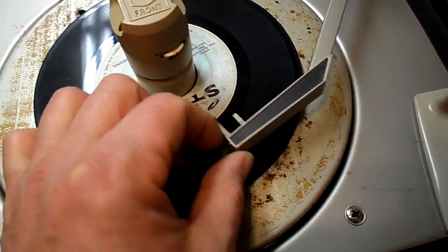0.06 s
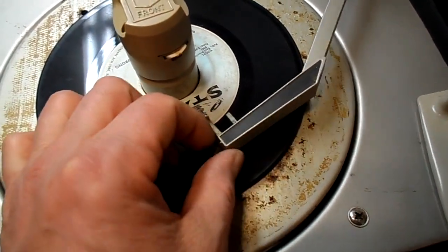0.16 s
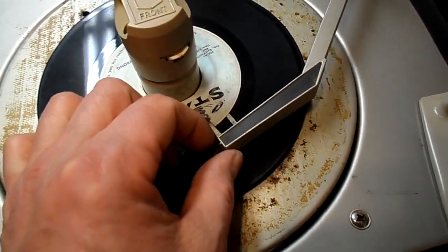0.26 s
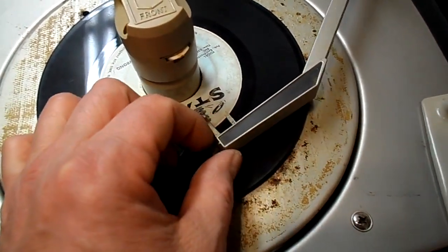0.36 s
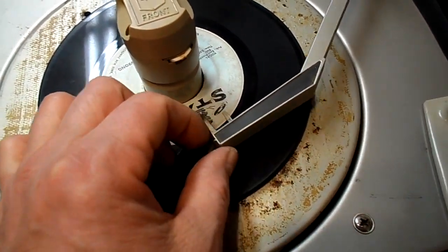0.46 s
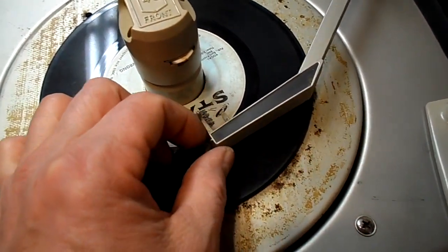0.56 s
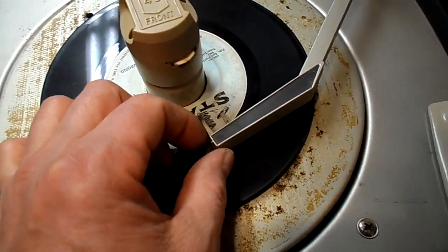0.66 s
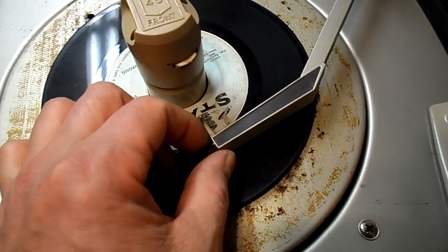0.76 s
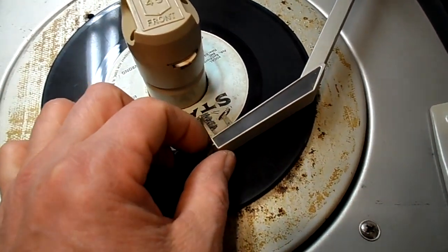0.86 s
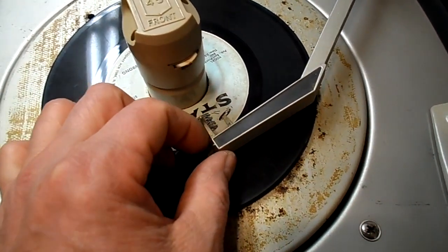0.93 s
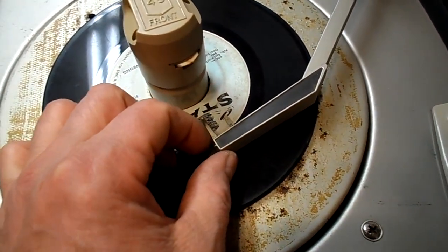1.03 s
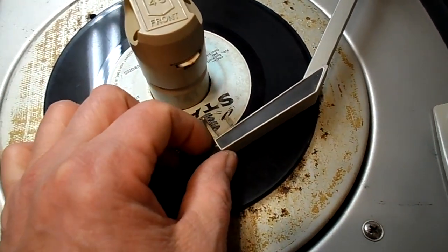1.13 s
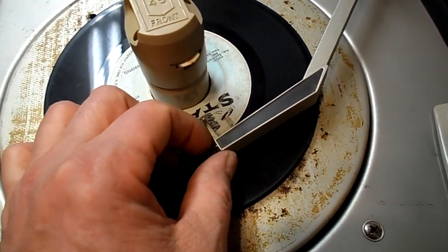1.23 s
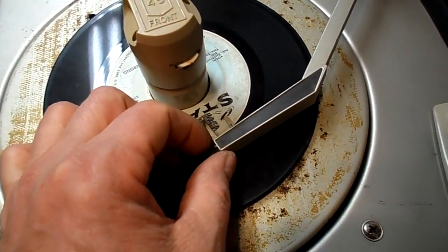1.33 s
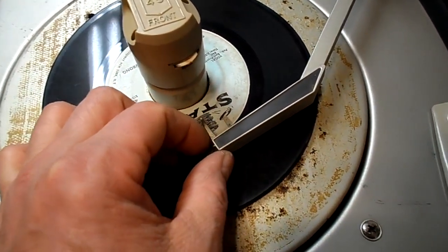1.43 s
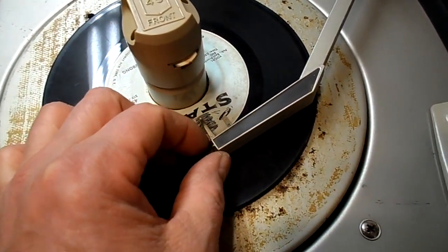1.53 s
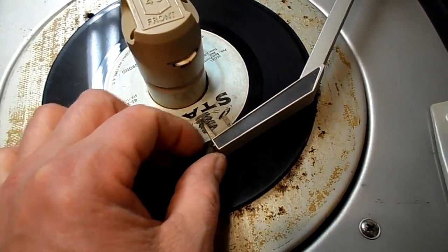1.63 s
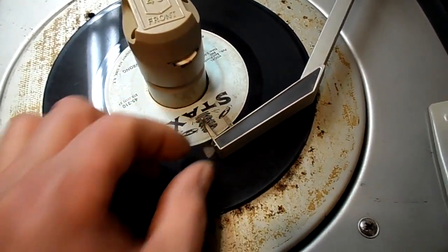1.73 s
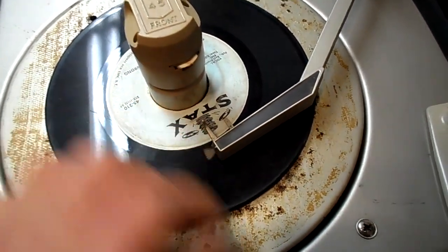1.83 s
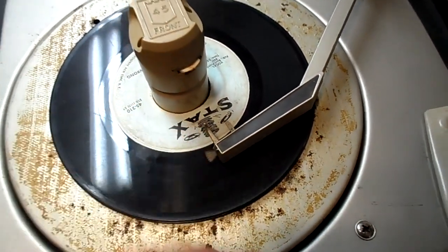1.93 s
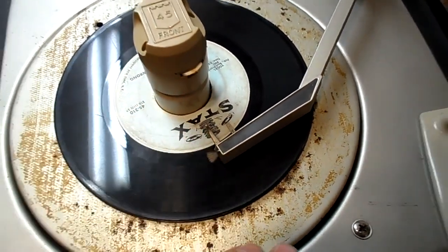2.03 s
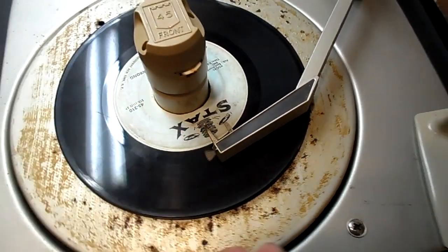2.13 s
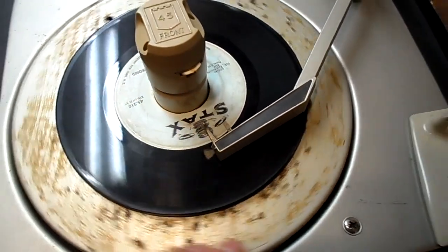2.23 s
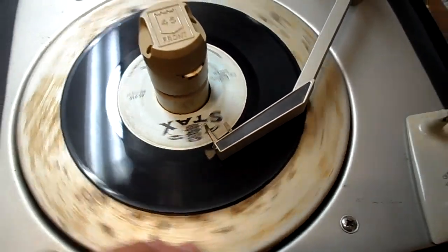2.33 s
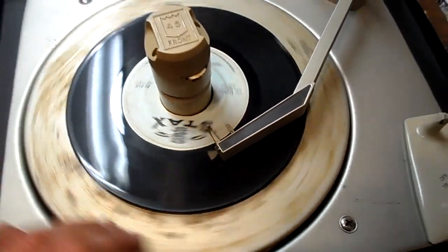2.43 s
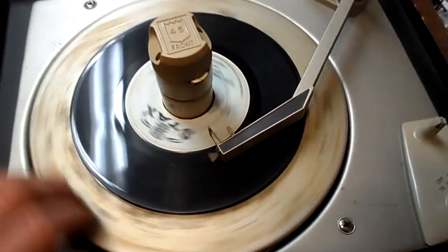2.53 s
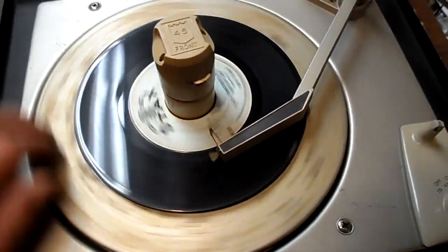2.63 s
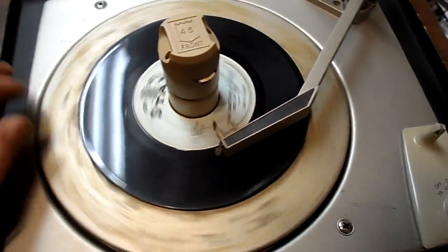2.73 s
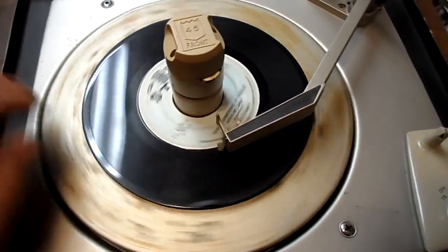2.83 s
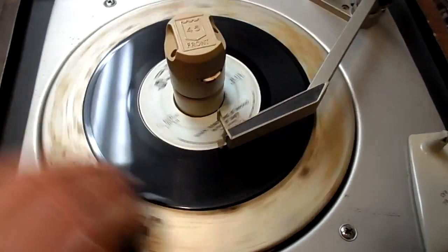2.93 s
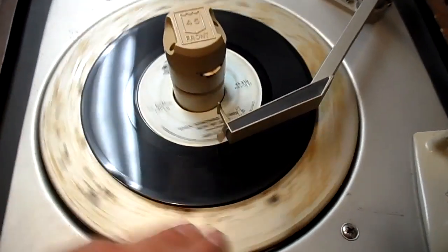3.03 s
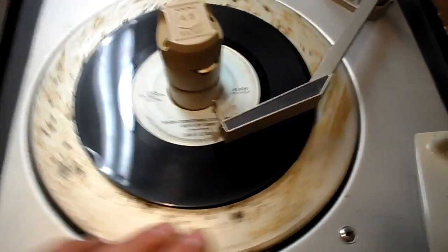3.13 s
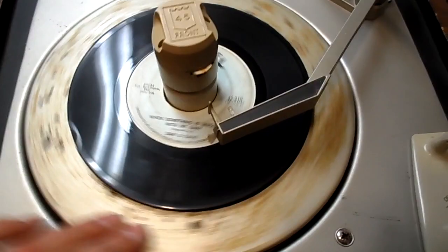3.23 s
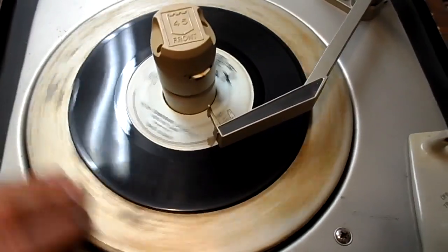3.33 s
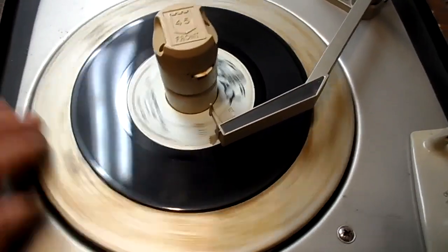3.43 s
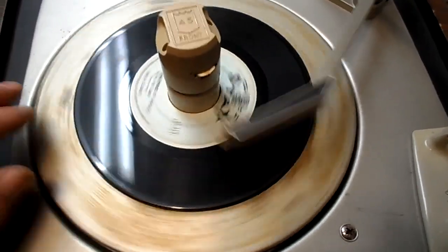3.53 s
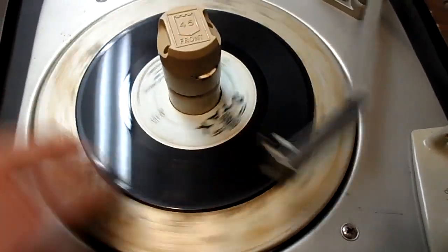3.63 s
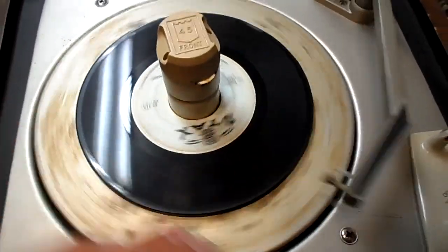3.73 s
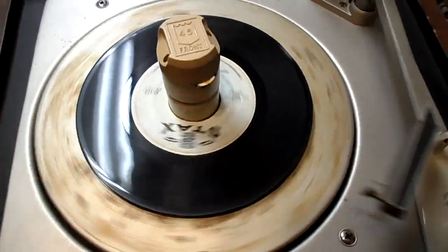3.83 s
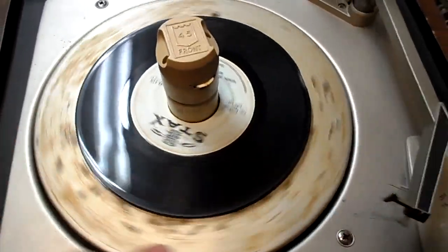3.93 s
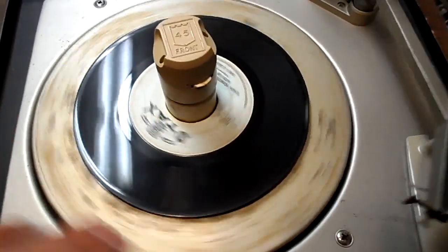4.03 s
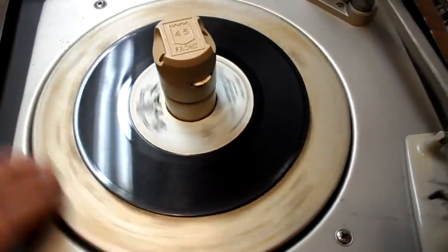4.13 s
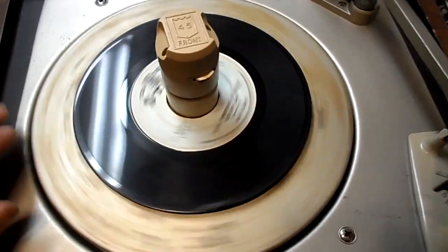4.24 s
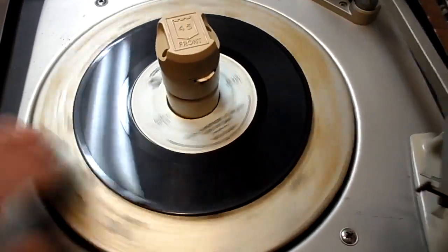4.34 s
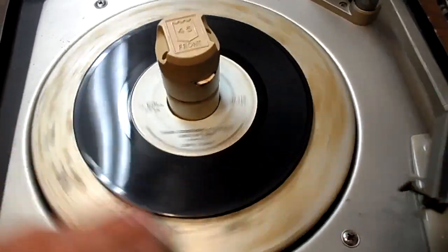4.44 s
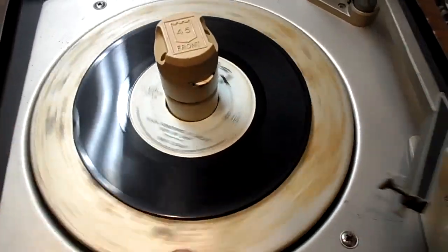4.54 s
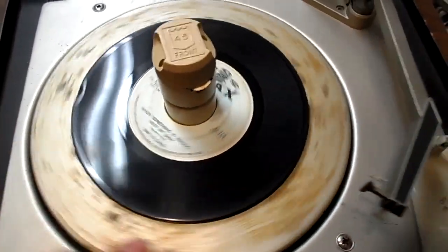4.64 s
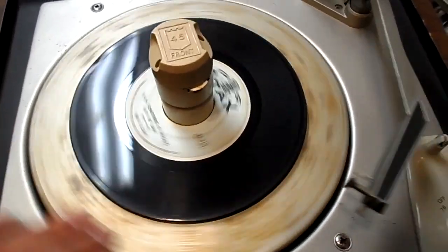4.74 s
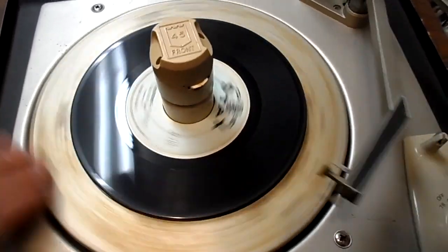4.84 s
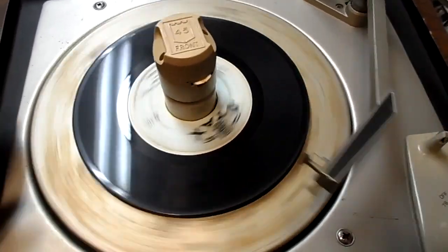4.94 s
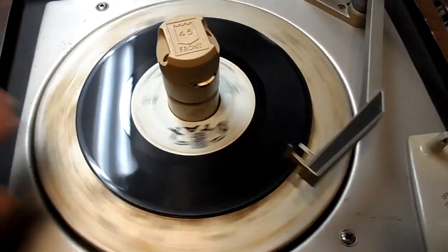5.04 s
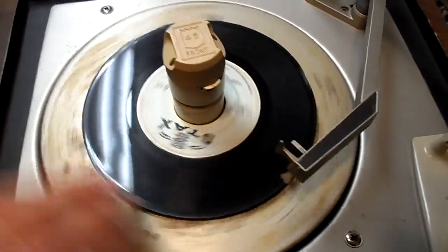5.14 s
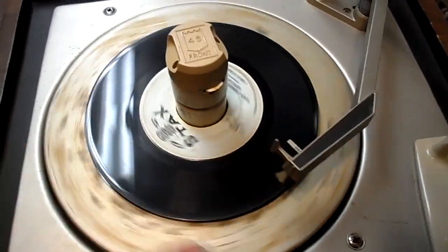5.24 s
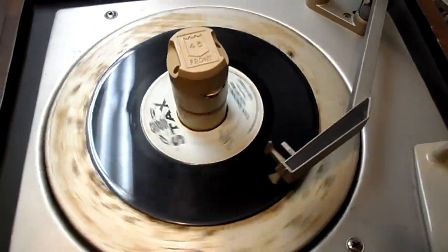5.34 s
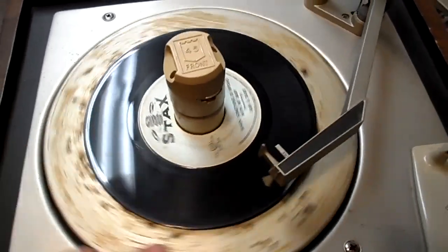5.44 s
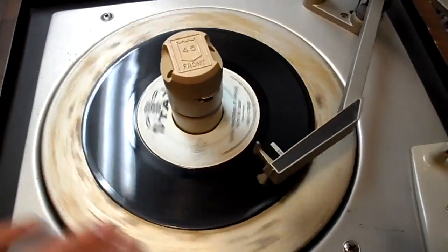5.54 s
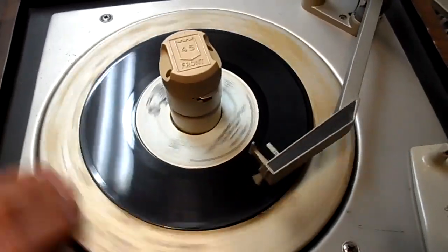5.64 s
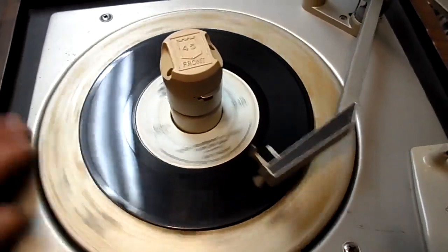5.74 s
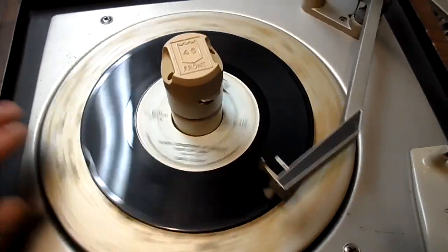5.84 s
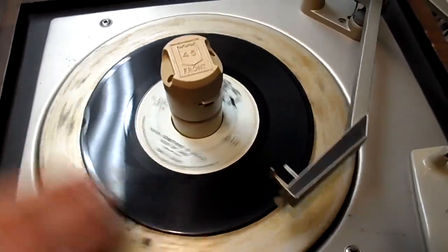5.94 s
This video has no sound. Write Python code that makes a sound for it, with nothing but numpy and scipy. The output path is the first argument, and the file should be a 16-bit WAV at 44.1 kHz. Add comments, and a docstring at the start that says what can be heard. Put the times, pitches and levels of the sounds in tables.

```python
"""A hand turns the platter of a record changer. First there is only a quiet room with mains hum,
a fine sizzle and a thin whine. From about 2 s, cams tick against the steel deck and the works rumble.
At 2.5 s a lever scrapes into gear, sticking and slipping, and then gears whirr as they swing the
tone arm out and back. From 3.3 s the hand brushes the rim in soft swishes. At last, just before 6 s,
the mechanism trips: a bouncing lever makes one sharp clack."""
import sys
import numpy as np
from scipy import signal
from scipy.fft import rfft, irfft, next_fast_len
from scipy.io import wavfile
from scipy.ndimage import uniform_filter1d, map_coordinates

SR = 44100
rng = np.random.default_rng(int(sys.argv[2]) if len(sys.argv) > 2 else 0)


def to_wav(s):
    """Save 16-bit WAV."""
    ch = np.atleast_2d(s).T  # columns
    pcm = np.round(np.clip(ch, -1, 1) * 32767)  # PCM
    wavfile.write(sys.argv[1], SR, pcm.astype(np.int16))


N = 264114
TIME = np.arange(N) / SR


def amp(db):
    """Turn decibels into a number to multiply by."""
    return 10 ** (np.asarray(db) / 20)


def unit(x):
    """Scale a sound so its average strength (rms) is 1."""
    return x / np.sqrt(np.mean(x ** 2) + 1e-20)


def along(points, hz):
    """Gain at hz on a curve through (frequency [Hz], level [dB]) points."""
    f, db = np.transpose(points)
    return amp(np.interp(np.log(hz + 1), np.log(f + 1), db))


def gains(rows):
    """Gain that follows (time [s], level [dB]) points, silent before the first."""
    s, db = np.transpose(rows)
    return amp(np.interp(TIME, s, db)) * (TIME >= s[0])


def swells(rows, rise, fall):
    """Gain of events that rise, hold and fall; rise and fall are in dB per second."""
    return np.max([amp(db - rise * np.maximum(s - TIME, 0) - fall * np.maximum(TIME - s - hold, 0))
                   for s, hold, db in rows], axis=0)


def wobble(rate):
    """A smooth random curve through `rate` new values a second."""
    return map_coordinates(rng.standard_normal(int(N * rate / SR) + 4), [TIME * rate])


def filtered(x, response):
    """Shape a sound with a filter given as a function of frequency."""
    size = next_fast_len(len(x) + 8192)
    return irfft(rfft(x, size) * response(np.fft.rfftfreq(size, 1 / SR)), size)[:len(x)]


def modes(rows):
    """A filter that rings at each (pitch [Hz], width [Hz], level [dB]); narrow ones ring longer."""
    return lambda f: sum((-1) ** k * amp(db) * 1j * f * width / (hz * hz - f * f + 1j * f * width)
                         for k, (hz, width, db) in enumerate(rows))


def grit(rate, spiky_db):
    """Friction: noise whose strength jumps from one tiny catch to the next."""
    return unit(amp(spiky_db * wobble(rate)) * rng.standard_normal(N))


# Tones of the hum: (pitch [Hz], level [dB], waver [dB])
HUM_TONES = [(119.9, -57, .25), (240, -82, 2), (249.7, -71.5, 1.5), (299.7, -81, 2), (799, -85, 3),
             (1049, -86, 3), (1123, -87, 3), (1498, -89, 3), (11500, -94, 2)]

def hum():
    """Mains power drives steady tones, each wavering a little in strength and phase."""
    out = np.zeros(N)
    for hz, db, waver_db in HUM_TONES:
        strength = np.sqrt(2) * amp(db + waver_db * wobble(9.1))
        drift = 0.3 * waver_db * wobble(5.6)
        out += strength * np.sin(2 * np.pi * hz * TIME + drift + rng.uniform(0, 2 * np.pi))
    return out


# Tone colour of the room's noise: (frequency [Hz], relative level [dB])
ROOM_COLOUR = [(10, -32), (16, 4), (28, 4), (50, -0.5), (100, -7), (150, -11.5), (250, -15), (400, -17),
               (700, -20), (1400, -22.5), (3600, -26.5), (6000, -25), (11000, -37), (16000, -34.5)]
# Bumps on that colour: (centre [Hz], width [Hz], boost [dB])
ROOM_BUMPS = [(229, 71, 1), (800, 57, 3), (1120, 150, 5), (3050, 82, 4.5)]

def room():
    """Steady room tone and hiss, strongest in the deep bass."""
    bumps = lambda f: amp(sum(db / (1 + ((f - hz) / width * 2) ** 2) for hz, width, db in ROOM_BUMPS))
    return amp(-60) * unit(filtered(rng.standard_normal(N), lambda f: along(ROOM_COLOUR, f) * bumps(f)))


# Loudness of the sizzle: (time [s], level [dB])
SIZZLE_LEVELS = [(0, -66.5), (.7, -65), (1.4, -66), (1.6, -68.5), (2.9, -66), (3.25, -64), (3.6, -66),
                 (4.3, -64.5), (4.85, -70), (5.3, -65), (5.99, -65)]
# Its tone colour: (frequency [Hz], relative level [dB])
SIZZLE_COLOUR = [(4500, -35), (5800, -12.5), (7000, -4), (8500, 0), (9800, -3.5), (11500, -13),
                 (14000, -18)]

def sizzle():
    """A fine, high sizzle swells and fades."""
    fizz = unit(filtered(grit(40, spiky_db=1.1), lambda f: along(SIZZLE_COLOUR, f)))
    return gains(SIZZLE_LEVELS) * fizz


# Peaks of the whine's filter, applied twice: (pitch [Hz], width [Hz], relative level [dB])
WHINE_PEAKS = [(6440, 100, 0), (7030, 100, 0), (7410, 50, 0), (8500, 60, 1.5), (9050, 50, 0)]

def whine(rest_db=-74, spinning_db=-72.5, spin_s=3.3):
    """A thin, wavering whine, a little louder once the platter spins."""
    level_db = np.where(TIME < spin_s, rest_db, spinning_db) + 1.2 * wobble(2.75)
    return amp(level_db) * unit(filtered(grit(30, spiky_db=1), lambda f: modes(WHINE_PEAKS)(f) ** 2))


# Cam contacts: (time [s], relative knock level [dB], knock pitch [Hz],
# relative click level [dB], click pitch [Hz], time for the chatter to fade by 60 dB [s])
CAM_CONTACTS = [(1.9404, -57, 1600, -62, 4500, .024), (2.0034, -64, 1200, -33, 4400, 0.0089),
                (2.3021, -53, 300, -62, 5300, .025), (2.488, -68, 1200, -48, 5600, .018),
                (2.4944, -64, 1200, -44, 5000, .02), (2.5048, -59, 300, -44, 4600, .016),
                (2.746, -62, 600, -50, 8000, .011), (2.7773, -42.5, 400, -33.5, 7000, 0.014),
                (2.7854, -34, 1020, -32.5, 4180, 0.032), (2.7915, -41, 950, -50, 4000, 0.027),
                (2.7973, -40, 850, -42, 5000, 0.019), (2.8419, -49, 800, -39, 4280, 0.035),
                (2.8851, -37.5, 910, -33, 2450, 0.025), (2.8879, -37.5, 1100, -29, 2840, 0.013),
                (2.897, -37, 520, -36, 3400, 0.019), (2.9144, -61, 700, -43, 6500, 0.016),
                (2.9352, -65, 900, -44, 5300, .02), (3.1559, -41.5, 1900, -37, 13500, 0.037),
                (3.617, -55, 600, -64, 4000, 0.018), (3.76, -57, 1090, -66, 4000, .02),
                (3.8101, -40, 1900, -31.5, 7600, .028), (3.816, -47, 500, -39, 2450, 0.031),
                (3.9144, -64, 1200, -55, 4800, .018), (3.9288, -53, 1100, -66, 4800, 0.019),
                (4.0002, -45.5, 1410, -62, 2900, 0.065), (4.0207, -54, 1200, -60, 8000, .038),
                (4.105, -56, 500, -50, 2900, 0.054), (4.4822, -54.5, 1600, -66, 4500, 0.037),
                (4.5094, -57, 1100, -66, 4000, 0.023), (5.1903, -56, 700, -46, 6200, 0.025),
                (5.197, -51, 1700, -48, 5000, 0.038), (5.2046, -49, 1300, -40, 5670, 0.049),
                (5.22, -52, 1000, -59, 3000, 0.028), (5.2339, -52, 1500, -59, 5000, 0.049),
                (5.2494, -60, 900, -50, 6840, 0.038), (5.3754, -49, 600, -62, 5000, 0.033),
                (5.438, -58, 600, -52, 8000, 0.032), (5.522, -52, 500, -55.5, 1600, 0.03),
                (5.5742, -55.5, 1200, -58.5, 3400, 0.02), (5.9572, -38, 1100, -60, 3400, .01)]
# How the steel deck rings: (pitch [Hz], width [Hz], relative level [dB])
DECK_RINGS = [(230, 70, 0), (300, 70, 0), (720, 130, 0), (900, 100, 0), (1150, 150, 0), (1560, 120, 0),
              (2290, 150, 0), (2850, 250, 0), (3200, 170, 0), (3700, 150, -1), (4850, 150, 0),
              (5800, 200, 0), (6300, 200, 0), (7100, 200, 0), (8600, 300, 0), (9200, 200, 0),
              (9950, 200, 0), (11650, 250, 0)]

def ticks():
    """Each contact is a blow and a short chatter that ring the deck: a low knock and a bright click."""
    def band(f, db, hz, below_db, above_db):
        """A peak at hz that loses below_db one octave down and above_db one octave up."""
        octaves = np.abs(np.log2((f + 1) / hz))
        return amp(db - np.where(f < hz, below_db, above_db) * octaves ** 2.8)

    out = np.zeros(N + SR)
    t = np.arange(-200, SR // 6) / SR
    # narrow low bands catch less of a burst, so they are lifted
    lift = lambda f: np.sqrt(3000 / (f + 300)) * (f > 170)
    deck = lambda f: (1 + amp(-6) * modes(DECK_RINGS)(f)) * lift(f)
    blow = amp(21) * (t == 0)
    for s, knock_db, knock_hz, click_db, click_hz, fade_s in CAM_CONTACTS:
        knock = lambda f: band(f, knock_db, knock_hz, below_db=3, above_db=3)
        click = lambda f: band(f, click_db, click_hz, below_db=18, above_db=36)
        chatter = amp(6.5 - 60 * np.maximum(t, 0) / fade_s) * (t > 0) * rng.standard_normal(len(t))
        tick = filtered(blow + chatter, lambda f: (knock(f) + click(f)) * deck(f))
        out[round((s + t[0]) * SR):][:len(t)] += tick
    return out[:N]


# Load on the turning works: (time [s], relative level [dB])
LOAD = [(2.2, -5), (2.6, -7.5), (2.95, -3.5), (3.15, -1), (3.4, -3), (3.6, -4), (3.8, 6.5), (3.92, 3),
        (4.1, -3), (4.38, 0.5), (4.6, -3.5), (4.9, -2.5), (5.1, 1.5), (5.28, 0.5), (5.6, -4.5), (5.8, -7),
        (5.93, 3.5)]

def works():
    """The deck rumbles and the cams rattle, both louder under more load."""
    deck = modes([(240.7, 39, 1.5), (316, 82, -2), (391, 274, -7.5)])
    cams = modes([(680, 1300, 5.4), (1160, 140, 3), (1510, 230, 0.5)])
    rumble = unit(filtered(grit(40, spiky_db=2), deck))
    rattle = unit(filtered(grit(90, spiky_db=2.5), cams))
    load = gains(LOAD)
    return amp(-66) * load ** 0.71 * rumble + amp(-70.5) * load * rattle


# Jerks of the lever dragging over metal: (time [s], hold [s], level [dB])
LEVER_JERKS = [(2.485, 0.031, -57), (2.545, .015, -54), (2.575, 0.032, -47), (2.62, .012, -53),
               (2.66, 0.053, -46.5), (2.785, 0.031, -43.5), (2.835, 0.021, -41), (2.88, 0.031, -41),
               (2.932, 0.0073, -44)]
# Tone colour of its rasp: (frequency [Hz], relative level [dB])
RASP_COLOUR = [(880, -49), (1500, -18), (2310, -15), (3150, 0.5), (4370, -8.5), (6240, -3.5), (9270, -5),
               (11000, -17.5), (15000, -31)]
# How the lever rings: (pitch [Hz], width [Hz], relative level [dB])
LEVER_RINGS = [(3050, 260, -17), (4880, 30, 7), (5210, 34, 6), (5750, 360, -2.5), (6360, 110, 4.5),
               (7000, 47, -1), (7570, 29, 6), (8620, 200, -17), (9060, 190, -2), (9770, 69, 5)]

def lever():
    """The lever sticks and slips; the tiny catches make it ring over a broad rasp."""
    colour = lambda f: along(RASP_COLOUR, f) * (0.67 + np.abs(modes(LEVER_RINGS)(f)))
    catches = amp(1.2 * wobble(90)) * grit(1200, spiky_db=4)
    return swells(LEVER_JERKS, rise=334, fall=1500) * unit(filtered(catches, colour))


# Spells of whirring: (time [s], hold [s], level [dB])
GEAR_RUNS = [(2.95, 0.16, -70.5), (3.65, 0.35, -71), (4.4, 0.34, -71), (5.08, .12, -71),
             (5.27, 0.13, -69.5), (5.9, .1, -71)]
# Peaks of the gears' filter, applied twice: (pitch [Hz], width [Hz], relative level [dB])
GEAR_PEAKS = [(2230, 120, -5), (2520, 90, 1), (2820, 90, -2), (3120, 90, -5)]

def gears():
    """The gears whirr while they drive the tone arm."""
    whirr = unit(filtered(grit(90, spiky_db=2.5), lambda f: modes(GEAR_PEAKS)(f) ** 2))
    return swells(GEAR_RUNS, rise=81, fall=44) * whirr


# Strokes of the hand on the rim: (time [s], hold [s], level [dB])
HAND_STROKES = [(3.34, 0.028, -56), (3.64, .05, -61.5), (3.715, 0.02, -58), (4.31, .04, -64.5),
                (4.36, 0.032, -59.5), (4.42, .045, -63), (4.85, 0.031, -61), (5.065, 0.054, -61.5),
                (5.135, 0.027, -58.5), (5.645, .02, -68), (5.8, .04, -66), (5.87, 0.077, -61.5)]
# Tone colour of sliding skin: (frequency [Hz], relative level [dB])
SKIN_COLOUR = [(1500, -25), (3000, -2), (4500, -7.5), (6000, -4.5), (8000, 0), (10000, 3), (12500, -7),
               (16000, -12)]

def hand():
    """Skin slides on the platter's rim: soft, bright swishes with faint squeaks."""
    squeak = modes([(4500, 100, 9), (5850, 87, 10), (9400, 110, -3)])
    colour = lambda f: along(SKIN_COLOUR, f) * (1 + np.abs(squeak(f)))
    return swells(HAND_STROKES, rise=400, fall=350) * unit(filtered(grit(200, spiky_db=2), colour))


# Where the trip lever rings: (pitch [Hz])
TRIP_PITCHES = [290, 520, 850, 1118, 1560, 1950, 2724, 2830, 3188, 3718, 4822, 5415, 5968, 6592, 7030, 7195,
                7450, 8860, 9171, 9721, 9979, 10800, 11650, 12600, 14200]
# The ring at each of those pitches: (width [Hz], relative level [dB])
TRIP_RINGS = [(40, 3.5), (120, -3), (100, -3.5), (24, 8.5), (70, -2.5), (100, 2), (110, 7.5), (80, 16),
              (60, 3), (45, 13), (50, 6), (70, 12), (55, 7), (80, 13), (40, 7), (80, 0), (150, 3),
              (200, 11.5), (130, 10), (80, 14), (65, 5), (130, -6), (100, 0), (100, -3), (200, -15)]

def trip(at_s=5.9592, first_gap_s=0.0009, gap_growth=1.27):
    """The trip lever bounces eight times, so fast that all its pitches ring as one clack."""
    lead_s = 0.005
    t = np.arange(SR // 10) / SR - lead_s
    bounce_times = first_gap_s * (gap_growth ** np.arange(8) - 1) / (gap_growth - 1)
    # each bounce is weaker than the last and dies in about 4 ms
    bounces = sum(amp(-1400 * s - 60 * np.maximum(t - s, 0) / 0.0039) * (t >= s) for s in bounce_times)
    spectrum = rfft(bounces * rng.standard_normal(len(t)))
    # even out the spectrum so every pitch gets the same push; this smears the rattle in time
    rattle = irfft(spectrum / np.sqrt(uniform_filter1d(np.abs(spectrum) ** 2, size=15)), len(t))
    # turn down the smear before the slam so the clack starts sharply
    rattle *= np.where(t < 0, amp(-14), 1)
    ring = modes([(hz, width, db) for hz, (width, db) in zip(TRIP_PITCHES, TRIP_RINGS)])
    crash = lambda f: amp(-5.5) * 1j * f / (1j * f + 1200)
    soften = lambda f: 1 / (1 + 1j * f / 9000) / (1 + 1j * f / 16000)
    clack = amp(9.5) * filtered(rattle, lambda f: (crash(f) + ring(f)) * soften(f))
    out = np.zeros(N + SR)
    out[round((at_s - lead_s) * SR):][:len(t)] = clack
    return out[:N]


def echo(x, fade_s=0.11):
    """The cabinet and room answer a sound with a short echo."""
    t = np.arange(SR // 3) / SR
    tail = rng.standard_normal(len(t)) * amp(-60 * t / fade_s) * (t > 0.004)
    return signal.fftconvolve(x, tail / np.linalg.norm(tail))[:N]


def scene():
    """Add everything into one channel; only the ticks, scrape and clack get an echo."""
    sharp = ticks() + lever() + trip()
    background = hum() + room() + sizzle() + whine()
    return (background + sharp + amp(-13.5) * echo(sharp) + works() + gears() + hand())[None]


def record(dry, top_hz=15780):
    """Cut away the very highest treble."""
    return filtered(dry[0], lambda hz: hz < top_hz)[None]


dry = scene()
out = record(dry)
to_wav(out)
```